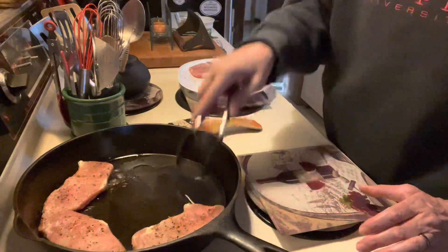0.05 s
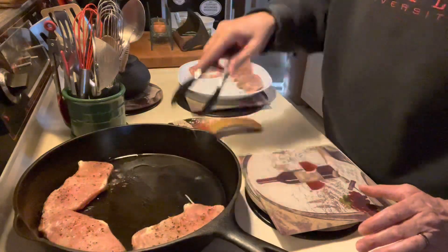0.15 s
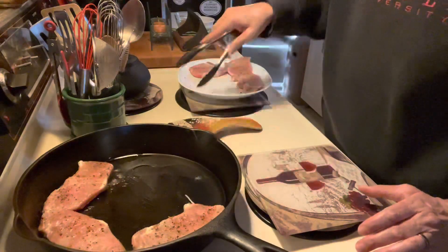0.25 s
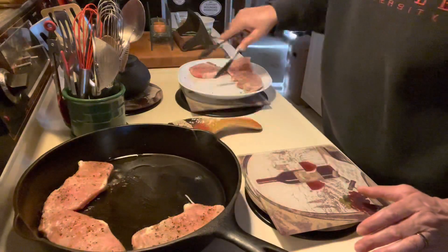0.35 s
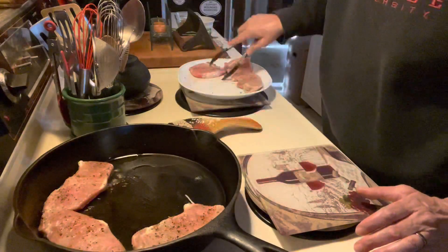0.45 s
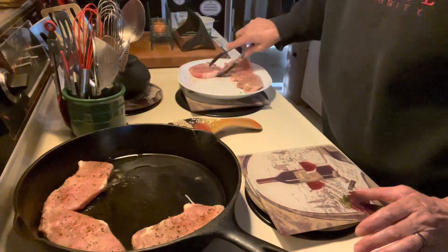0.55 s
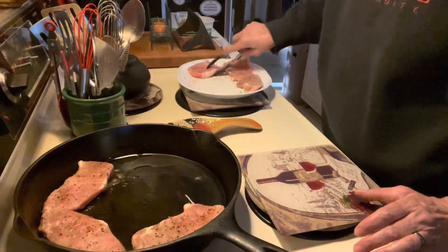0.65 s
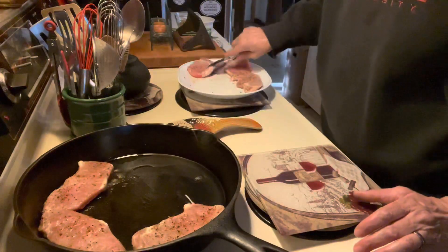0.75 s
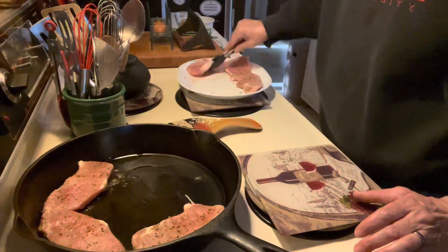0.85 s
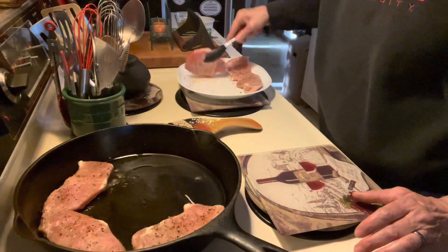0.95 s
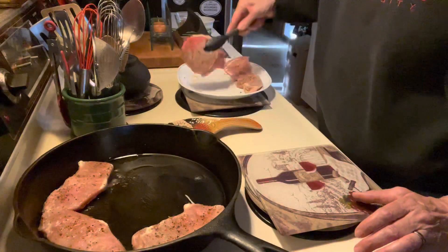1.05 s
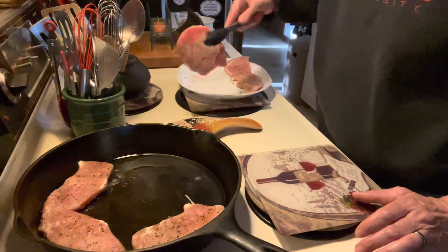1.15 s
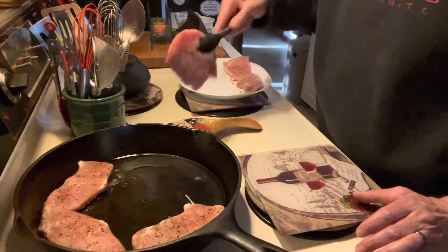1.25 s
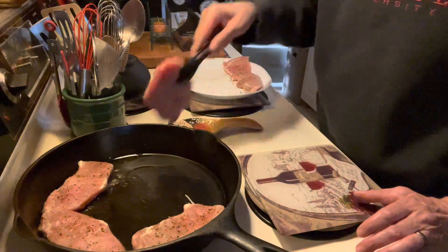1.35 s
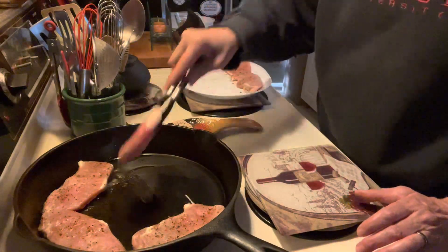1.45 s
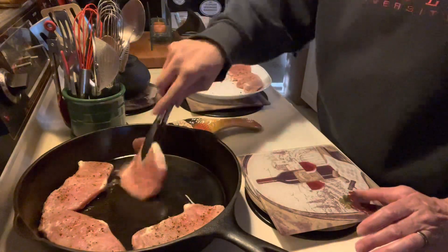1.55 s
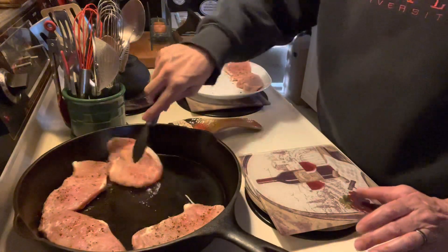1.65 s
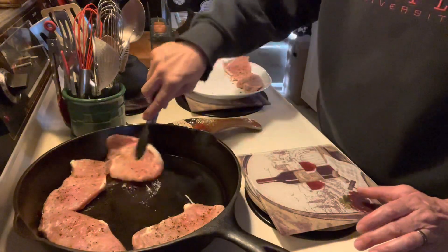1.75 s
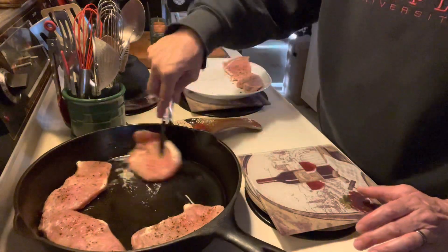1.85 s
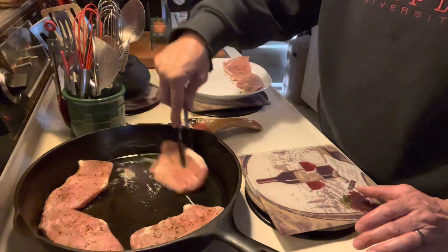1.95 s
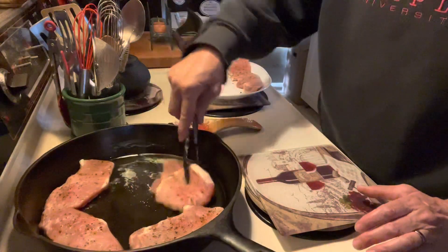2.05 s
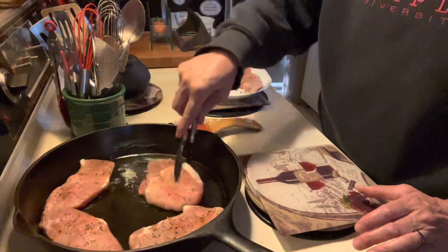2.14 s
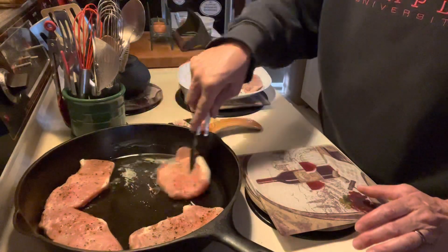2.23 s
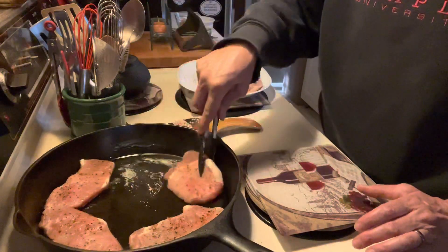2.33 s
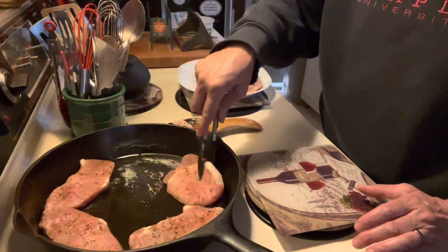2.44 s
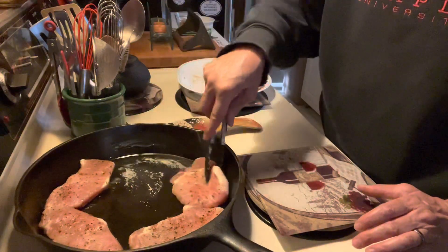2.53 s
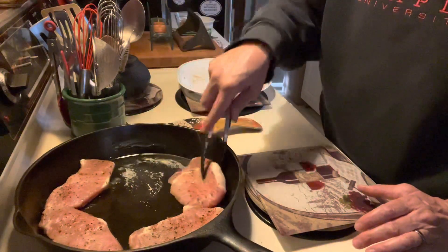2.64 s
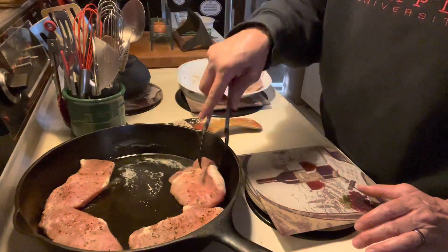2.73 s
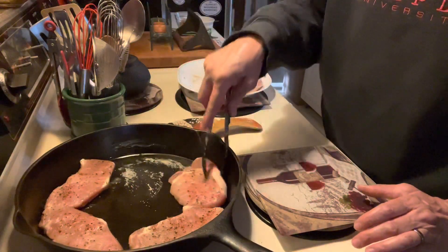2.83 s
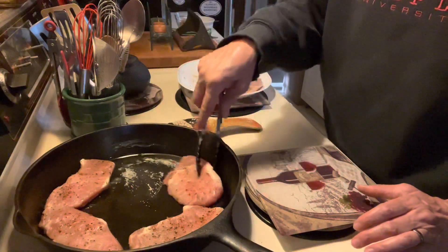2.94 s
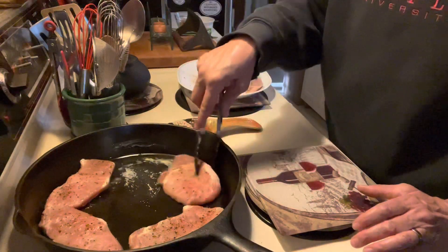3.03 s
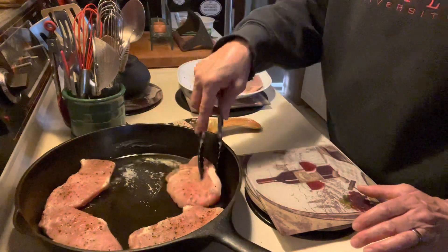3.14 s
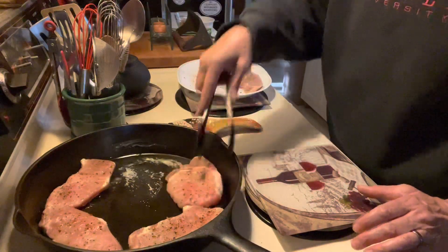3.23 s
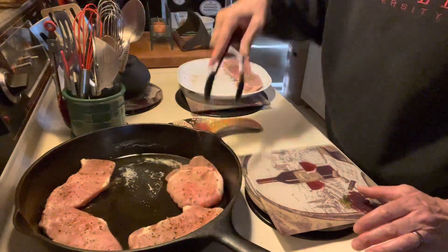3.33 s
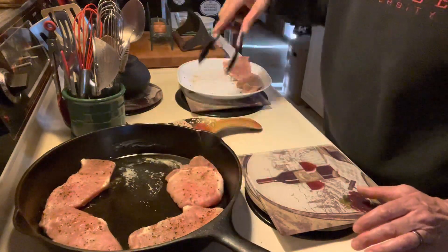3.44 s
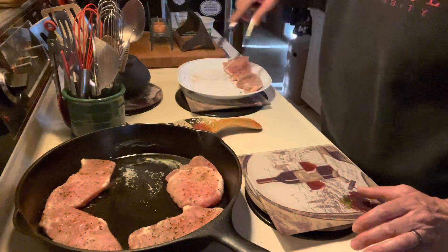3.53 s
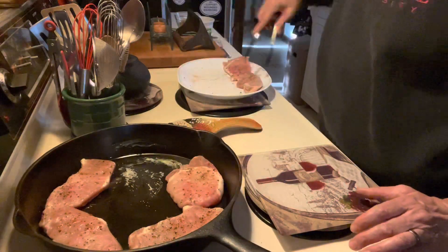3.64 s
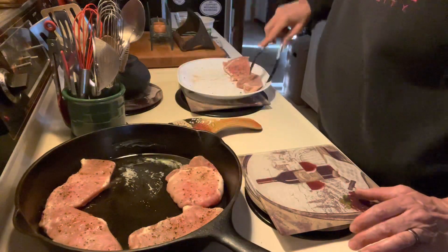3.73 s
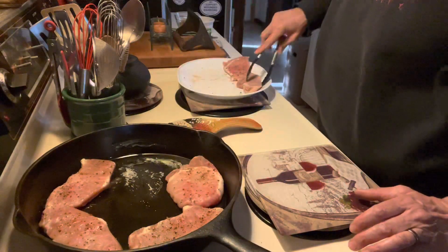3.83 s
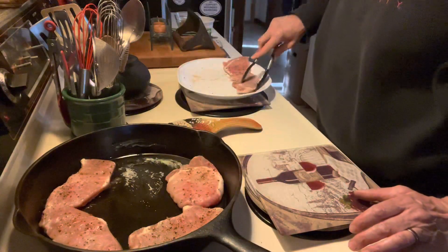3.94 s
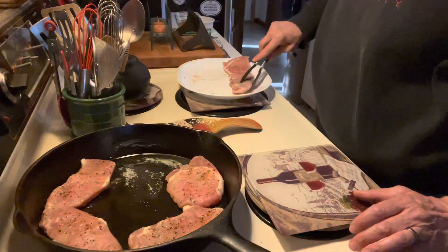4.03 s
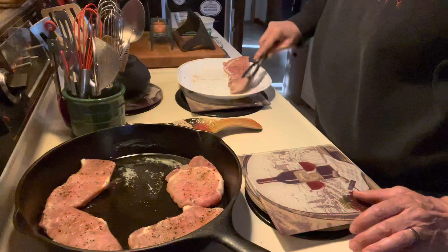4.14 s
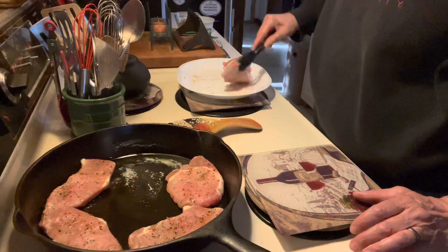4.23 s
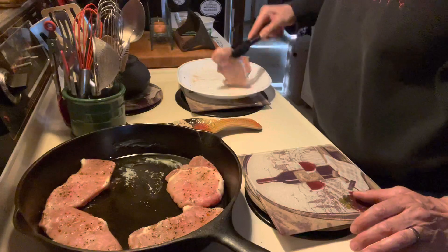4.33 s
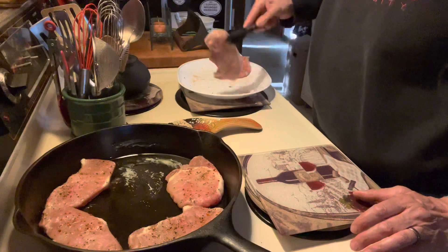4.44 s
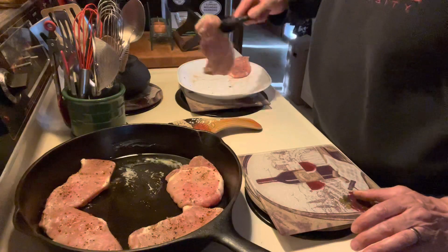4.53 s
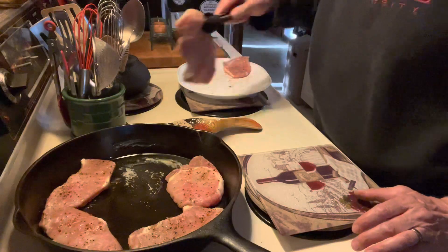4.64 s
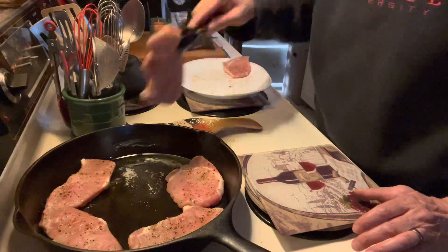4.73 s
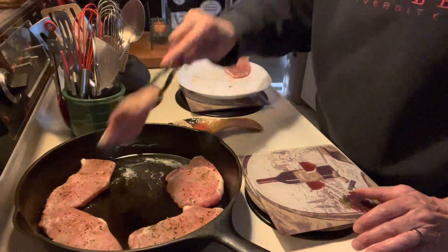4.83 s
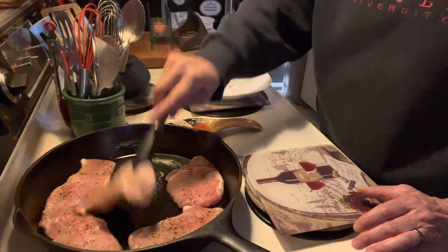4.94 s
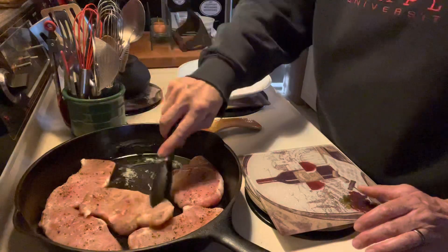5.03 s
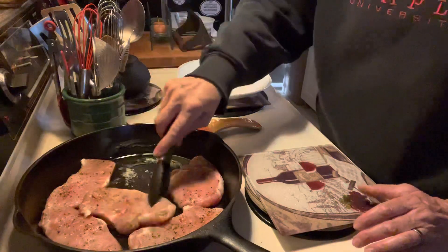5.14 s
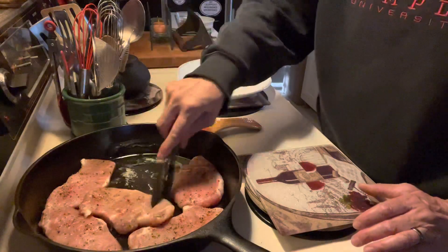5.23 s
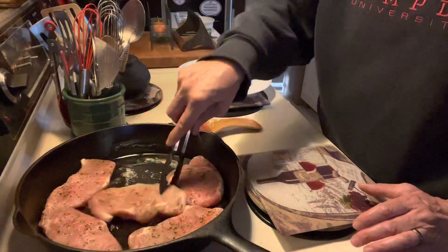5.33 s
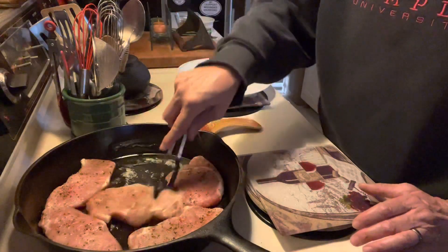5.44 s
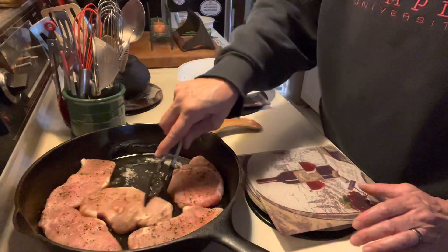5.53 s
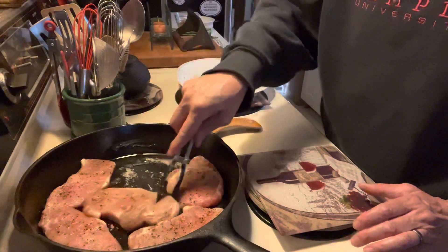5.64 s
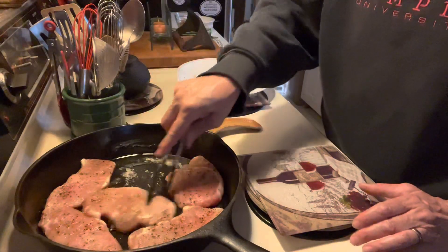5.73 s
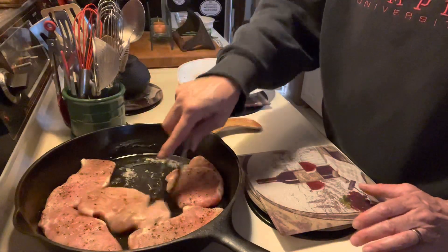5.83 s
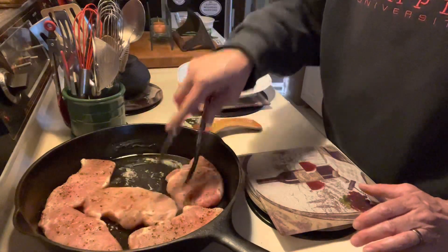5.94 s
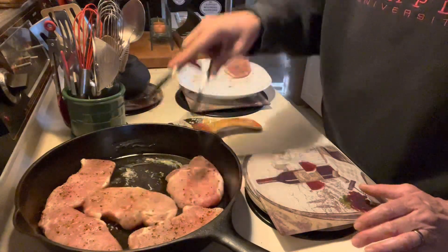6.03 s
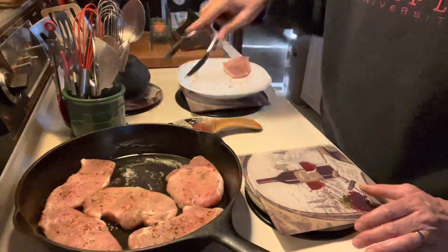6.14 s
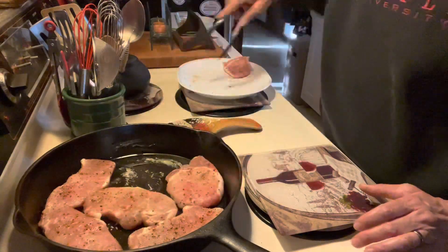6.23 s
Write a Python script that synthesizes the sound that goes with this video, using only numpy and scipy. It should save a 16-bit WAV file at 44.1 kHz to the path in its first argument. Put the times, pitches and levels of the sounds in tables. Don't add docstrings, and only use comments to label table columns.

```python
import sys
import numpy as np
from scipy import signal
from scipy.fft import rfft, irfft, next_fast_len
from scipy.io import wavfile
from scipy.ndimage import uniform_filter1d, map_coordinates

SR = 44100
rng = np.random.default_rng(int(sys.argv[2]) if len(sys.argv) > 2 else 0)


def inscribe(sig):
    pcm = np.round(np.clip(np.atleast_2d(sig).T, -1, 1) * 32767)
    wavfile.write(sys.argv[1], SR, pcm.astype(np.int16))


def field_ratio(decibels):
    return 10 ** (np.asarray(decibels, dtype=float) / 20)


N = 276948


def unit(x):
    return x / np.sqrt(np.mean(x ** 2) + 1e-20)


def along(points, hz):
    f, v = np.transpose(points)
    return np.interp(np.log(hz + 1), np.log(f + 1), v)


def curves(rows):
    s, *columns = np.transpose(rows)
    return [np.interp(np.arange(N) / SR, s, c) for c in columns]


def wobble(rate):
    knots = rng.standard_normal(int(N * rate / SR) + 4)
    return map_coordinates(knots, [np.arange(N) * rate / SR])


def filtered(x, response):
    m = next_fast_len(N + 8192)
    return irfft(rfft(x, m) * response(np.fft.rfftfreq(m, 1 / SR)), m)[..., :N]


def coloured(x, spectrum):
    return filtered(x, lambda hz: unit(field_ratio(along(spectrum, hz))))


def patchy(depth_db):
    z = signal.stft(rng.standard_normal((2, N)), nperseg=256)[2]
    field = uniform_filter1d(rng.standard_normal(z.shape[1:]), size=5, axis=0)
    field = uniform_filter1d(field, size=12, axis=1)
    return signal.istft(z * field_ratio(depth_db * unit(field)), nperseg=256)[1][:, :N]


def bursts(rate, t60, spread_db, clump_db):
    chance, size = rng.random(N), rng.exponential(1, N)
    burst = chance < rate / SR * field_ratio(clump_db * wobble(25))
    hits = burst * field_ratio(2 * spread_db * np.minimum(size, 3.5))
    power = signal.lfilter([1], [1, -field_ratio(-120 / (t60 * SR))], hits)
    return power / np.abs(uniform_filter1d(power, size=SR // 4) + 1e-9)


# time in seconds, room lift in dB, hold in seconds, floor lift in dB.
JOLTS = [
    (0, 7.5, 0.23, 5.5),
    (.68, 10.5, 0.46, 15.5),
    (2.04, 6.5, 0.22, 4),
    (2.866, 9.5, 0.58, 5.5),
    (4.13, 3.5, .1, 1),
    (4.75, 9.5, 0.49, 4),
    (5.13, 14, 0.6, 9.5),
    (5.847, 10, .5, 10.5),
]


def gate():
    t = np.arange(N) / SR
    open_s, close_db_per_s = 0.048, 28

    def lift(s, db, hold):
        opening = db * (t - s) / open_s + db
        closing = db - close_db_per_s * (t - s - hold)
        return np.clip(np.minimum(opening, closing), 0, abs(db))

    return np.max([[lift(s, db, hold), lift(s, floor_db, hold)] for s, db, hold, floor_db in JOLTS], axis=0)


# frequency in Hz, level in dB per Hz.
RUMBLE = [(60, -60), (130, -19), (200, -8), (300, -5), (450, 0.5), (700, -8), (1200, -93)]
# frequency in Hz, level in dB per Hz.
SHAKE = [(20, -34), (40, -16), (55, -6.5), (90, -8), (140, -4), (250, -55)]


def kitchen():
    lift_db, floor_db = gate()
    hum_hz = 118.2 + 2.2 * wobble(22)
    hum_db = -68.5 + 0.66 * lift_db + 2.8 * wobble(27)
    hum = field_ratio(hum_db) * np.sin(2 * np.pi * np.cumsum(hum_hz) / SR) * [[1], [.1]]
    rumble = field_ratio(-65 + lift_db + 0.25 * wobble(6.0)) * coloured(patchy(1.5), RUMBLE)
    shake = field_ratio(-73.5 + floor_db) * coloured(patchy(1.0), SHAKE)
    return rumble + hum + shake


# start in seconds, frequency in Hz, level in dB, rise in seconds, 60 dB decay in seconds.
KNOCK = [
    (0.649, 1030, -23, 0.0037, 0.03),
    (0.652, 1745, -32, 0.0047, 0.089),
    (0.65, 1620, -40, 0.003, 0.18),
    (0.657, 490, -20, 0.0031, 0.025),
    (.674, 733, -19.5, 0.0028, 0.022),
    (0.661, 281, -10.5, 0.036, 0.058),
    (0.675, 127, -12, 0.026, 0.06),
    (.694, 2250, -35, .003, 0.029),
    (.70, 814, -33, 0.0026, 0.052),
]


def knock():
    t = np.arange(N) / SR
    ring = np.zeros(N)
    for s, hz, db, rise, t60 in KNOCK:
        age = np.maximum(t - s, 0)
        ring += field_ratio(db - 60 * age / t60) * (1 - np.exp(-age / rise)) * np.sin(2 * np.pi * hz * age)
    return np.array([ring, -.3 * np.roll(ring, SR // 300)])


def clack():
    age = np.arange(N) / SR - KNOCK[0][0]
    fall = (age > 0) * field_ratio(-27 - 60 * np.abs(age) / .09)
    return coloured(fall * rng.standard_normal((2, N)), GURGLE)


# time in seconds, peak in dB, crack over the peak in dB.
PLOPS = [(1.1, -31.5, 1), (2.003, -39, -13), (2.862, -24, 3.5), (3.469, -31, 8), (4.314, -28, 0),
         (4.498, -29.5, 6.5), (4.603, -41, 5), (4.718, -28.5, 6), (5.324, -28, 8.5), (6.191, -38.5, 5)]


def thuds():
    t, push = np.arange(SR // 10) / SR, np.zeros(N + SR)
    for s, db, _ in PLOPS:
        push[round(s * SR):][:len(t)] += field_ratio(db - 11 - 60 * t / .02)
    return coloured(push[:N] * rng.standard_normal((2, N)), RUMBLE)


# time in seconds, peak in dB, middle band in dB.
SPITS = [(0.0697, -12, -23), (0.1096, -10, -20), (0.161, -14, -21), (0.2159, -10, -24), (0.415, -9, -29),
         (0.4204, -11, -25), (0.4634, -13, -24), (0.5462, -13, -25), (0.636, -7, -25), (0.6973, -14, -21),
         (0.7696, -17, -20), (1.1019, -12, -17), (1.1563, -8, -25), (1.3862, -13, -21), (2.8215, -10, -24),
         (2.9954, -10, -26), (3.9619, -13, -19), (3.9853, -12, -23), (4.1624, -12, -26), (4.2188, -13, -24),
         (4.2946, -10, -20), (4.3266, -9, -23), (4.3705, -9, -25), (4.4503, -13, -21), (4.5965, -9, -25),
         (4.7284, -12, -26), (4.7784, -11, -18), (4.805, -10, -18), (4.8773, -12, -24), (4.9556, -14, -17)]
# time in seconds, peak in dB, middle band in dB.
FLECKS = [(0.3084, -13, -25), (0.4584, -13, -23), (0.6604, -17, -18), (0.9497, -16, -15),
          (1.0664, -17, -12), (1.1114, -14, -17), (1.2251, -17, -19), (1.2724, -17, -22),
          (3.0434, -15, -20), (3.4516, -14, -14), (3.5514, -14, -17), (3.7934, -19, -19),
          (4.0168, -14, -24), (4.4794, -15, -19), (4.5401, -14, -23), (4.6544, -14, -25),
          (4.6748, -13, -19), (4.7047, -12, -19), (4.7414, -13, -25), (4.7644, -11, -25),
          (4.8643, -12, -24), (4.8998, -16, -15), (5.1394, -9, -16), (5.9974, -11, -15), (6.1384, -11, -17)]


def drops():
    rows = [(s, db, (middle_db + 31) / 18) for s, db, middle_db in SPITS + FLECKS]
    for s, u, size in rng.random((40, 3)):
        rows.append((s * N / SR, -22 - np.log(1 - .95 * u), 0.59 * size))
    cracks = []
    for s, db, size in rows:
        crack_db = min(-11 + 1.15 * (db + 11), -9) - 3.5
        cracks.append((s + .001, crack_db, -33 + 20 * size, -14 + 12 * size, max(.003 + .006 * size, .002)))
    blisters = [(s + .001, db + top_db, 2.5 - top_db, 4, .0084) for s, db, top_db in PLOPS]
    return cracks + blisters


def spits():
    parts, t = np.zeros((3, 2, N + SR)), np.arange(SR // 40) / SR
    for s, db, low_db, middle_db, t60 in drops():
        start = round(s * SR)
        life = np.clip(t60, .002, .03) * np.array([1.2, 1.5, 2.4])[:, None, None]
        level = np.array([db + 7.5, db + middle_db + 3.5, db + low_db + 2.0])[:, None, None]
        spray = np.clip(rng.standard_normal((3, 2, len(t))), -1.5, 1.5)
        spray *= 1 - np.exp(-(t / .0009) ** 2)
        parts[..., start:][..., :len(t)] += field_ratio(level - 1 - 60 * t / life) * spray
        parts[:, 0, start + 12] += field_ratio(level[:, 0, 0] + 7.5) * np.sqrt(.004 / t60)
    return sum(coloured(p[:, :N], colour) for p, colour in zip(parts, (FIZZ, BOIL, GURGLE)))


# time in seconds, steam in dB, juice under the meat in dB.
SIZZLE = [(0, -27, -0.5), (.5, -27.5, 0), (1.3, -29, -1), (1.545, -30, -1.5), (1.6, -15.5, -4),
          (1.73, -23.5, 1), (1.93, -17.5, -1.5), (2.04, -18.5, 1), (2.24, -20, -1.5), (2.3, -24, 0),
          (2.75, -21.5, -1), (3.3, -25, -1), (3.9, -26.5, -0.5), (4.94, -27.5, -1), (5.02, -21, 3),
          (5.4, -19, 2), (5.9, -21, 3), (6.28, -24, 3.5)]
# time in seconds, length in seconds, steam in dB, juice in dB.
PUFFS = [(0.359, 0.02, -3, 2), (0.427, 0.024, -6, -6.5), (1.72, .1, 3, 5), (1.954, 0.13, -1, -3),
         (2.248, 0.047, 1, 3), (2.312, .03, 3, -1.5), (0.298, 0.035, 2.5, 0.5), (1.26, 0.08, 2.5, 0.5),
         (1.468, 0.036, 5, 0), (4.3, 0.026, 1, -6), (2.116, 0.16, 0.5, 0), (2.47, 0.13, 3, -0.5),
         (2.548, 0.063, -4, 3.5), (2.656, 0.058, 2, 1), (2.993, 0.088, 1, -2.5), (3.565, 0.12, 0.5, 4),
         (4.977, 0.023, 0.5, 1), (5.384, 0.056, 1, 4), (5.439, 0.036, 1, 3), (5.502, 0.034, 2.5, 1.5),
         (5.57, 0.053, 1, 1.5), (5.81, .06, 2, 0.5), (5.953, 0.12, 2, -2)]
# start in seconds, length in seconds, gurgle lift in dB.
PRESSES = [
    (1.99, 0.33, 4),
    (2.854, 0.21, 3.5),
    (3.22, 0.27, 0.5),
    (5.048, .12, 2.5),
]
# time in seconds, pocket lift in dB, scatter lift in dB.
LAID = [
    (1.699, 1.6, 1.5),
    (5.9, 1.7, 0),
]


def controls():
    steam_db, juice_db = (c[::64] for c in curves(SIZZLE))
    t = np.arange(0, N, 64) / SR
    for s, length, db, wet_db in PUFFS:
        bump = np.exp(-(2 * (t - s) / length) ** 2)
        steam_db, juice_db = steam_db + db * bump, juice_db + wet_db * bump
    middling_db = -26
    spread_db = np.clip(3.5 - 0.33 * (steam_db - middling_db), 0, 9)
    swell = sum(field_ratio(2 * (db - 20)) * np.exp(-abs(t - s) / 0.01) for s, db, _ in SPITS)
    steam_db = steam_db + 10 * np.log10(1 + swell / field_ratio(2 * steam_db))
    trapped_db, rim_db = sum(np.outer(lifts, np.clip((t - s) / .15, 0, 1)) for s, *lifts in LAID)
    press_db = np.zeros(len(t))
    for s, length, db in PRESSES:
        inside_s = np.minimum(t - s, s + length - t)
        press_db += db * np.clip(inside_s / 0.012 + .5, 0, 1)
    more_db = steam_db - middling_db
    boil_db = -35 + 1.14 * more_db + 1.02 * juice_db
    gurgle_db = -41.5 + .6 * more_db + 0.5 * juice_db + press_db
    pocket_db = -44 + 1.3 * more_db + 0.63 * juice_db + .6 * press_db + trapped_db
    return curves(np.transpose([t, steam_db, boil_db, gurgle_db, pocket_db, spread_db, 4 + rim_db]))


# frequency in Hz, level in dB per Hz.
FIZZ = [(2500, -40), (6000, -8), (8000, -.5), (9300, -.5), (10300, -2), (12000, 0), (14500, 0),
        (15800, -1.5), (16600, -4)]
# frequency in Hz, level in dB per Hz.
BOIL = [(1500, -45), (2800, -20), (3500, -0.5), (4600, -0.5), (5500, 1), (7000, -1.5), (10000, -12),
        (15000, -50)]
# frequency in Hz, level in dB per Hz.
GURGLE = [(60, -77), (200, -39.5), (420, -18), (600, -5), (1100, -3.5), (1700, 0), (2100, 0), (2800, -11.5),
          (5000, -61.5)]
# frequency in Hz, level in dB per Hz.
POCKET = [(1400, -40), (2000, -5), (2400, 0), (2800, -1.5), (3300, -2), (4200, -30)]


def sizzle():
    fizz_db, boil_db, gurgle_db, pocket_db, spread_db, scatter_db = controls()
    common = bursts(900, .007, spread_db, clump_db=2.5)
    surge = spread_db / 4 * (wobble(12) + 0.57 * wobble(26))
    fizz = 0.48 + 0.31 * common + 0.13 * bursts(1500, 0.0021, spread_db, clump_db=6)
    boil = 0.48 + 0.34 * common + 0.14 * bursts(900, 0.0014, spread_db, clump_db=7)
    gurgle = 0.77 + 0.055 * common + 0.11 * bursts(250, 0.01, spread_db, clump_db=1)
    scatter = field_ratio([np.zeros(N), np.clip(scatter_db, -3, 7.5)])
    fine = field_ratio(fizz_db - 1.58 + 0.72 * surge) * coloured(np.sqrt(fizz) * patchy(1.67), FIZZ)
    middling = field_ratio(boil_db - 0.36 + 0.77 * surge) * coloured(np.sqrt(boil) * patchy(1.8), BOIL)
    large = field_ratio(gurgle_db - 2.5 + 0.36 * surge) * coloured(np.sqrt(gurgle) * patchy(1.9), GURGLE)
    trapped = field_ratio(pocket_db + 0.3 + .8 * surge) * coloured(np.sqrt(gurgle) * scatter * patchy(1.2), POCKET)
    return fine + middling + large + trapped


# frequency in Hz, width in Hz, lift in dB.
SKILLET = [(591, 60, 5), (724, 50, 4), (878, 40, 4), (1122, 100, 3), (1266, 60, 4), (1476, 80, 2.5),
           (1730, 60, 3), (2270, 60, 2), (4669, 200, 2.5), (7772, 150, 1.5)]


def skillet(x):
    return filtered(x, lambda f: field_ratio(sum(db / (1 + (2 * (f - hz) / width) ** 2) for hz, width, db in SKILLET)))


# frequency in Hz, correlation.
ALIKE = [(60, .84), (250, .7), (1200, .55), (2000, .72), (2600, .9), (3200, .88), (3800, .35), (5300, .25),
         (6500, .55), (7800, .92), (15000, .88)]
# frequency in Hz, lead of the left in radians.
LEAD = [(0, 0), (150, .1), (350, 1.1), (1400, 1.1), (2200, 2.55), (2850, 3.15), (3400, 3.75), (4300, 4.7),
        (5100, 3.6), (6200, 1.9), (8050, 0), (16100, -9.42)]
# frequency in Hz, left minus right in dB.
LEAN = [(60, -3), (110, -1), (200, -3), (380, 3.5), (700, 4), (1290, 3), (2380, 0.5), (4400, 6),
        (8120, -1.5), (15000, -1.5)]


def ports(pair):
    def mixing(hz):
        turn = np.arccos(np.clip(along(ALIKE, hz), -1, 1)) / 2
        return np.array([np.cos(turn), np.sin(turn)])

    def tilt(hz):
        half = field_ratio(along(LEAN, hz) / 2) * np.exp(.5j * np.interp(hz, *np.transpose(LEAD)))
        return np.array([half, 1 / half])

    direct, scattered = filtered(pair, mixing)
    return filtered(np.array([direct + scattered, direct - scattered]), tilt)


def scene():
    return ports(skillet(sizzle() + spits()) + knock() + kitchen() + thuds() + clack())


def top_cut(x):
    return signal.sosfilt(signal.butter(12, 16510, fs=SR, output="sos"), x)


def record(dry):
    return top_cut(dry)


dry = scene()
out = record(dry)
inscribe(out)
```